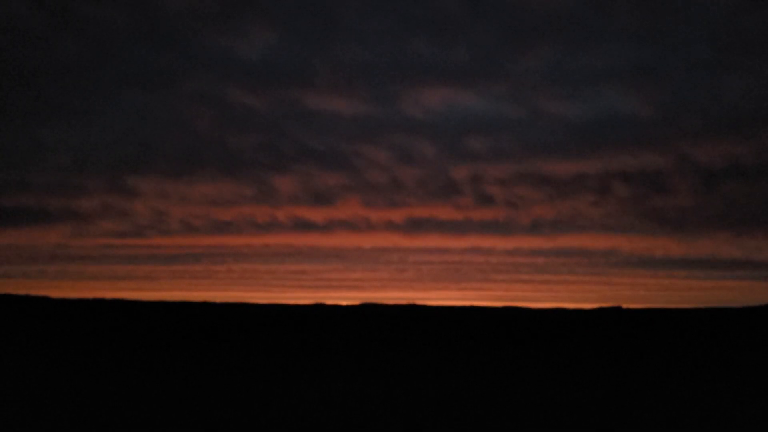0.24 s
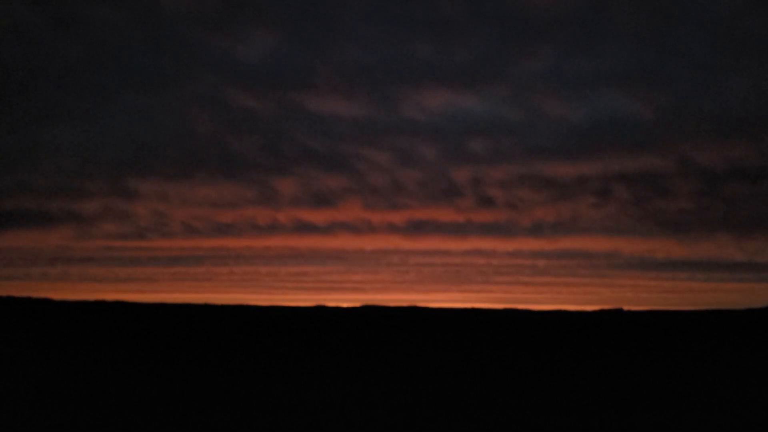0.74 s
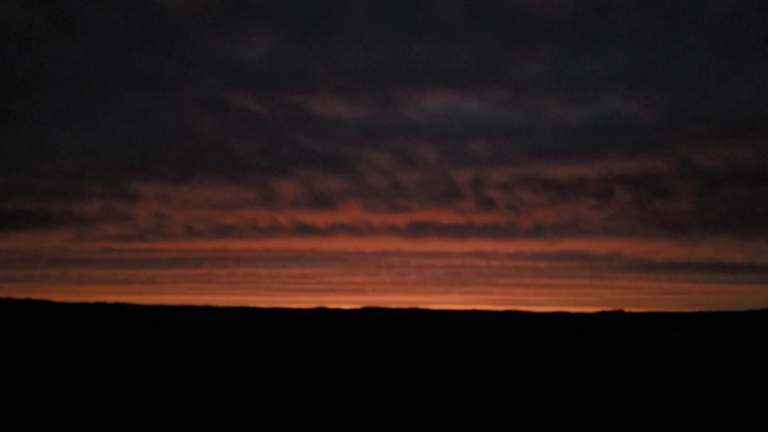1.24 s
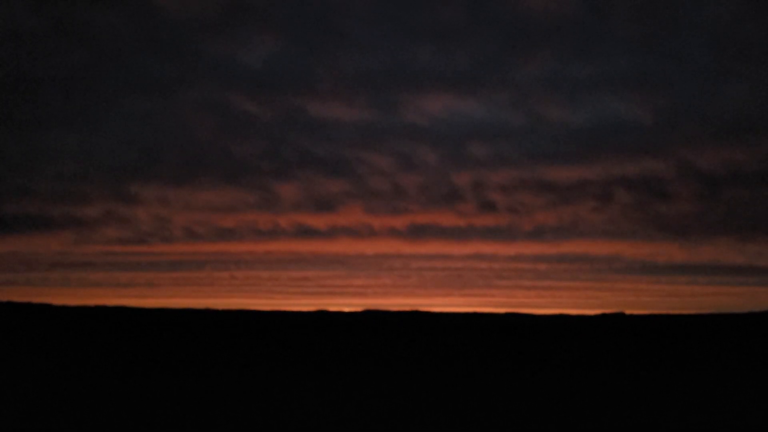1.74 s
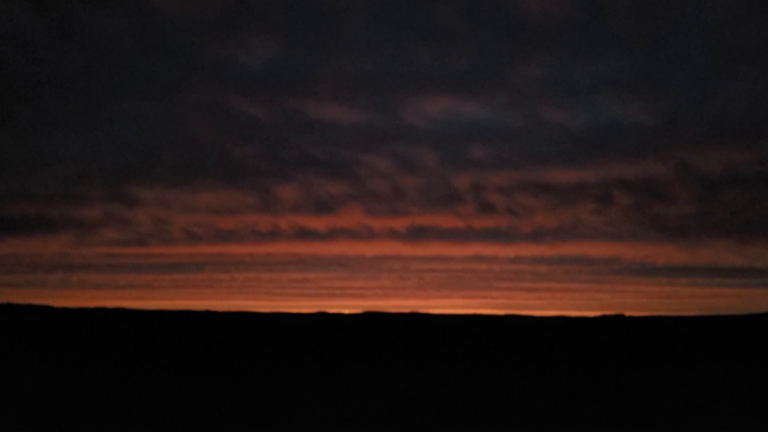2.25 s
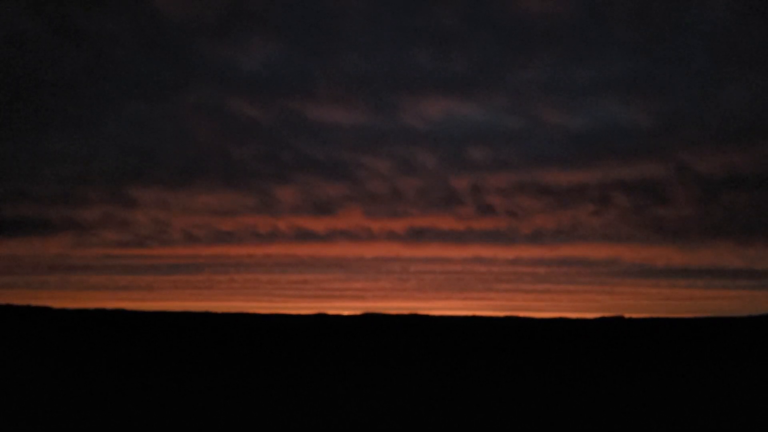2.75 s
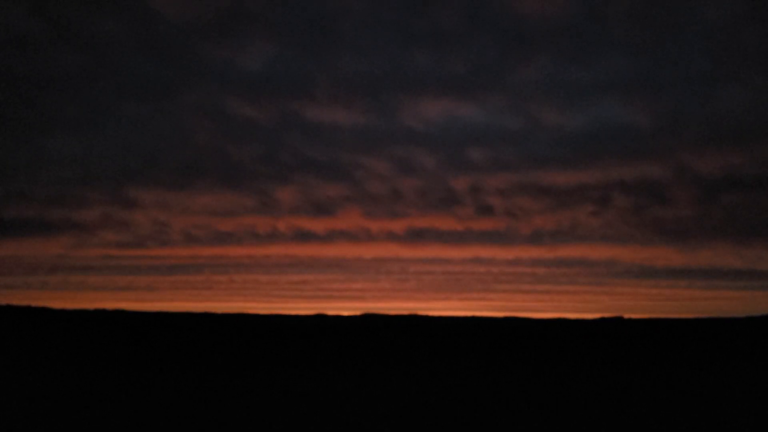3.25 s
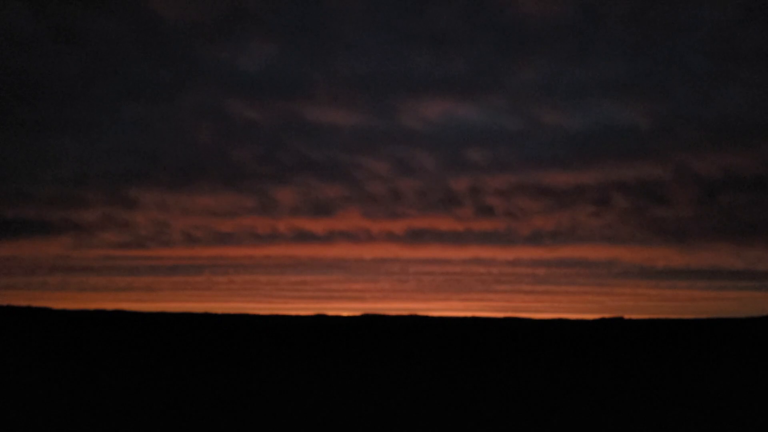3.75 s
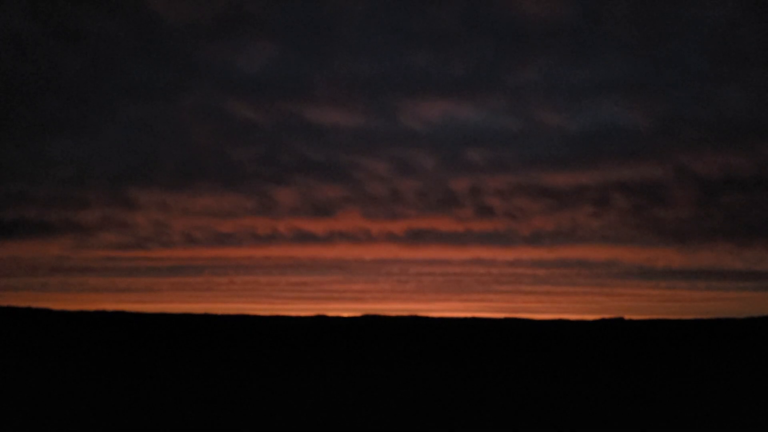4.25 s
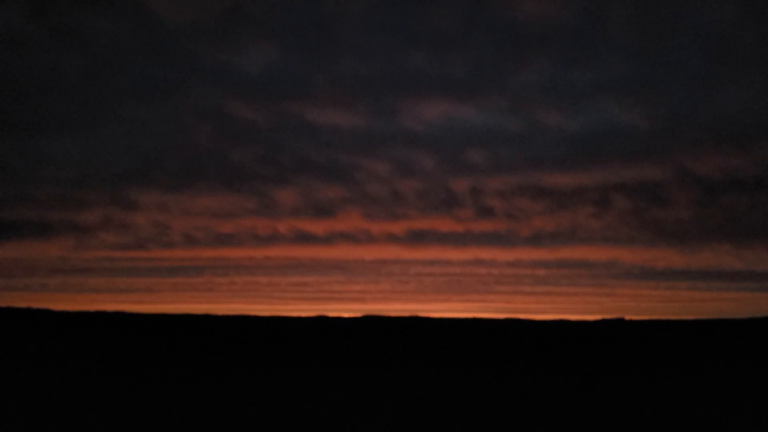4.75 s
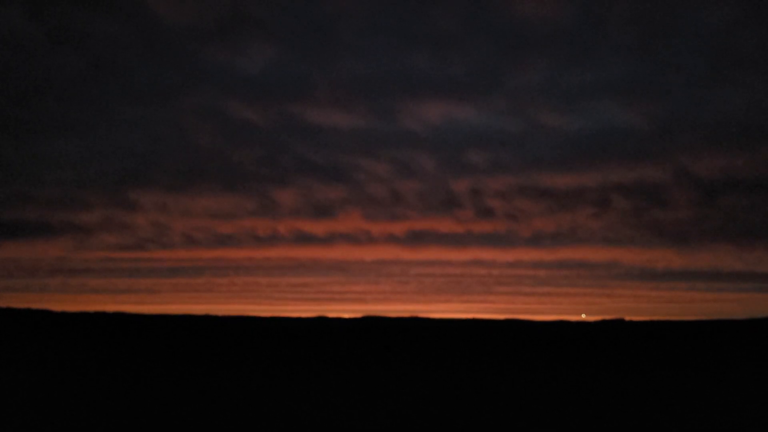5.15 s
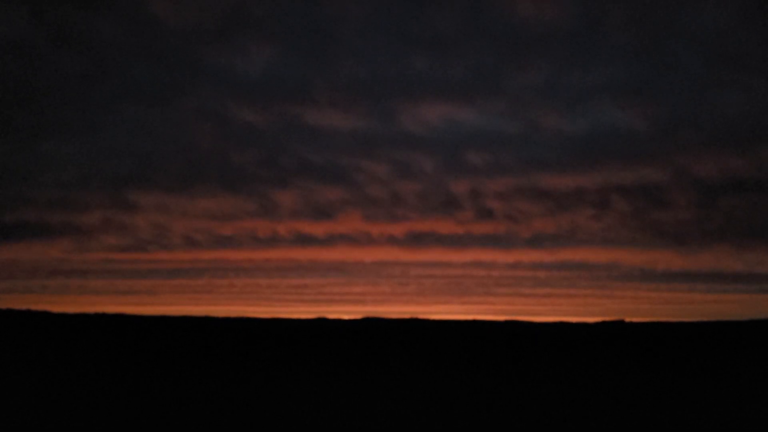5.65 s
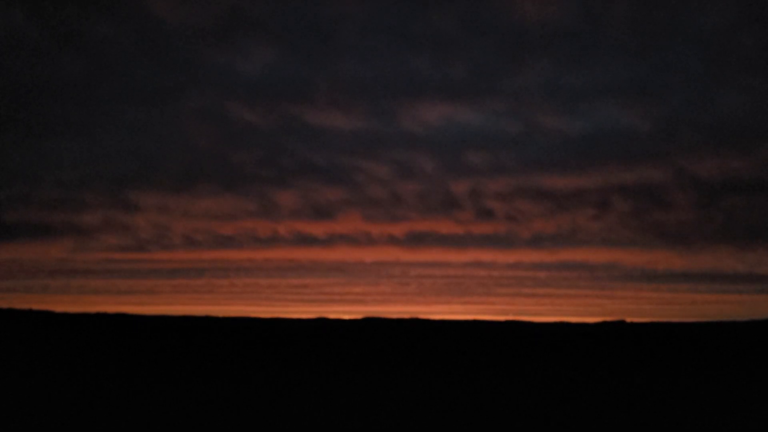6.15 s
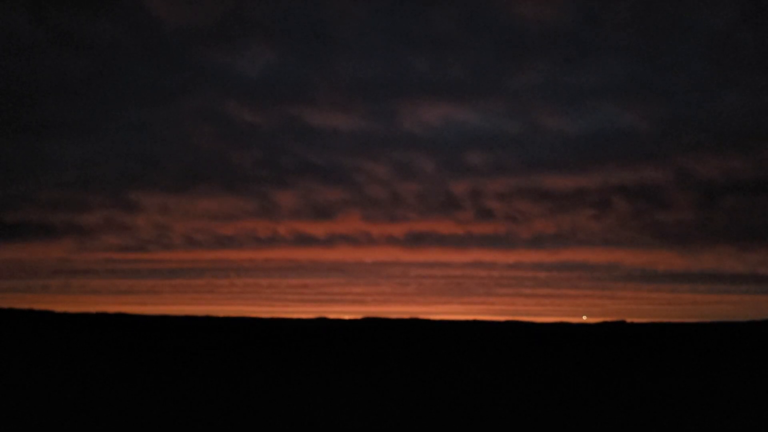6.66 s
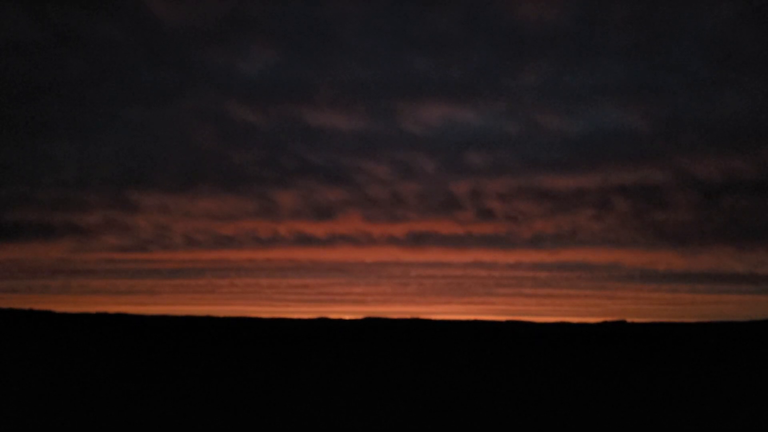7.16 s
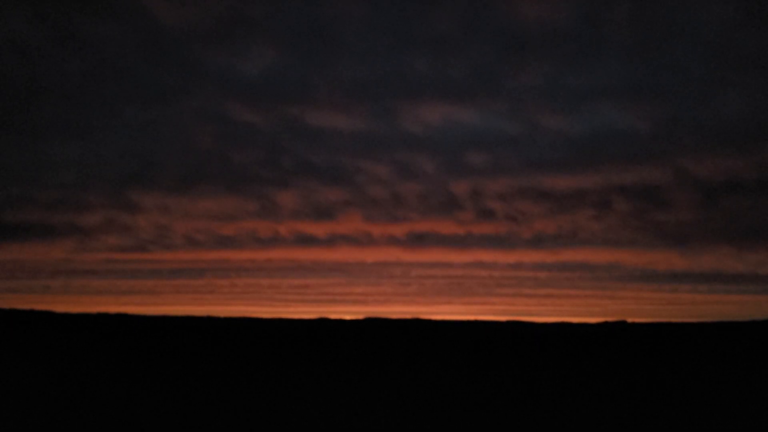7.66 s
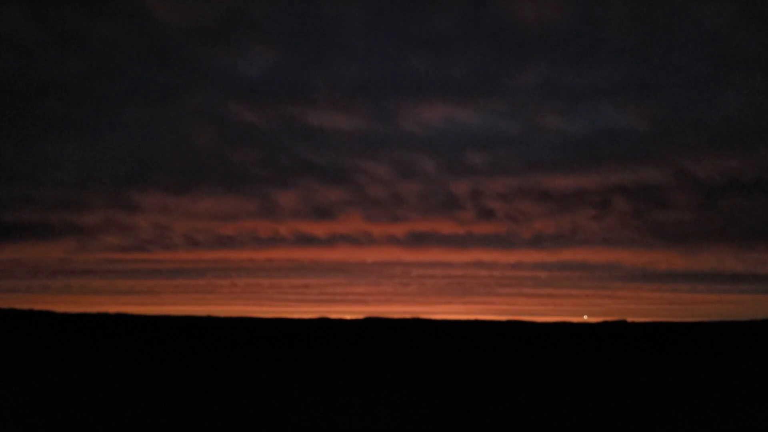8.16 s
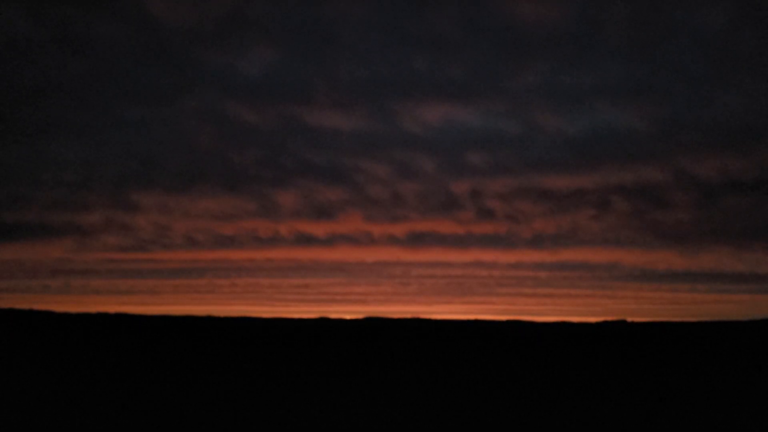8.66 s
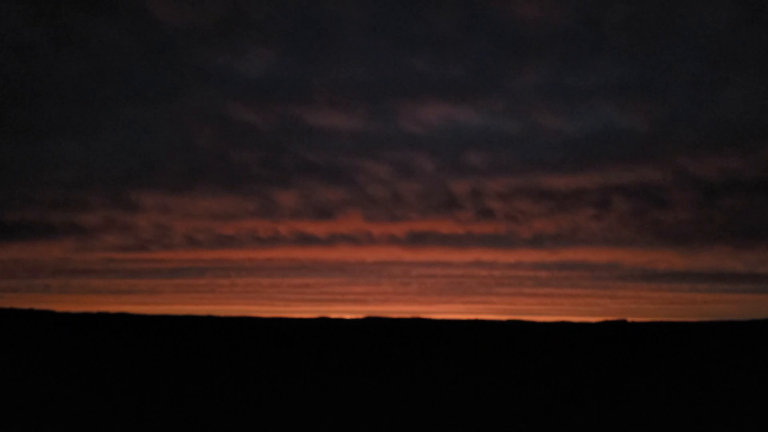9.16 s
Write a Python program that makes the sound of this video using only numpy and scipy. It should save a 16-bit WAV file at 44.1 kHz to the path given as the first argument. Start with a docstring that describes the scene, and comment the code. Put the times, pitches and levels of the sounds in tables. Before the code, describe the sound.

Distant bull elk whistle waveringly across a quiet plain at dusk, then a nearer bull bugles, climbing, turning hoarse and sliding down; camera clicks and hiss.

```python
"""A near bull elk bugles on a still plain: its whistle climbs in register jumps, turns hoarse and slides down.
Before it several far bulls call: sines drawn towards throat resonances, some with overtones.
A few low grunts are falling pulses of the vocal folds; a bird chirps twice in pure gliding notes.
Camera clicks are damped snaps ringing the body, with scuffs and soft bumps, over coloured stereo hiss."""
import sys
import numpy as np
from scipy import signal
from scipy.fft import rfft, irfft, next_fast_len
from scipy.io import wavfile
from scipy.ndimage import uniform_filter1d

SR = 44100
rng = np.random.default_rng(int(sys.argv[2]) if len(sys.argv) > 2 else 0)


def store_pcm(level_fs):
    """Save levels as 16-bit WAV."""
    pcm = np.round(np.clip(level_fs, -1, 1) * 32767).astype(np.int16)
    wavfile.write(sys.argv[1], SR, np.atleast_2d(pcm).T)


N = 415422
TIME = np.arange(N) / SR
# bearings: delay of the right ear
NEAR_LAG_S, FAR_LAG_S, FARTHEST_LAG_S, SHORT_LAG_S = 0.00055, 0.00033, 0.00028, 0.00018


def near_bull(octave_db=-21, ring_hz=3340, rasp_db=-1, lumpy_db=2.5, rasp_cost=1.5, wobble_hz=7):
    """Vocal folds chop the whistle into side tones, then break into a lumpy rasp that takes its power."""
    # effort: time_s, level_db
    effort = [(5.79, -81), (5.83, -63.5), (6.08, -52.5), (6.2, -53.5), (6.4, -51), (7.4, -51.5),
              (8.28, -49.5), (8.385, -50.5), (8.425, -67)]
    # throat resonances where the whistle swells: centre_hz, reach_hz, boost_db
    throat_swells = [(1163, 62, 9.5), (1491.6, 83, 13), (1696, 36, 6.5)]
    # vocal folds, mean pitch: time_s, pitch_hz
    fold_pitch = [(6.12, 254), (6.44, 234.5), (6.8, 225.3), (7.02, 238), (7.13, 256.7), (7.3, 240)]
    # ear balance by pitch: pitch_hz, left_minus_right_db
    ear_balance = [(1190, 1), (1460, 4), (1670, 3)]

    hz = near_pitch()
    boost_db, _ = throat(hz, throat_swells, steepness=4.1)
    throb, rough = hoarseness()
    unsteady_hz = wobble_hz * np.minimum(rough + throb, 1) * drift(14)
    level_db = in_time(effort)[0] + boost_db
    phase, height = whistle(hz + unsteady_hz, level_db, jitter=0.0019, flutter_db=1.1)
    height = height * sounding(effort) / np.sqrt(1 + (rasp_cost * rough) ** 2)

    fold_hz = in_time(fold_pitch)[0] * (1 + (0.0096 + 0.065 * rough) * drift(60))
    folds = 2 * np.pi * np.cumsum(fold_hz) / SR
    side_tones = tract(2 * np.sin(phase) * (np.cos(folds) + 1.1 * np.cos(2 * folds)))
    lumpy_noise = rng.standard_normal(N) * from_db(lumpy_db * drift(39))
    rasp = rms_one(lowpass(tract(lumpy_noise), 1850, order=8))
    voice = np.sin(phase) + throb * side_tones + rough * from_db(rasp_db) * rasp

    # octave rings where it meets a high throat resonance
    octave = from_db(octave_db) * resonance(height * np.sin(2 * phase), ring_hz, 380)
    pan_db = np.interp(hz, *np.transpose(ear_balance))
    return place(height * voice, pan_db, NEAR_LAG_S) + place(octave, -2, FAR_LAG_S)


def near_pitch(jump_s=0.008):
    """Pitch in Hz: stepped notes on the way up, slides on the way down, smoothed over jump_s."""
    # register steps: start_s, pitch_hz, creep_hz_per_s
    steps = [(5.789, 1122, 29.5), (5.936, 1188, 26), (6.19, 1454, 138.5), (6.417, 1640, -10.5),
             (6.799, 1681, 0.5)]
    # two slides, with a jump between: time_s, pitch_hz
    slides = [
        [(7.38, 1625), (7.396, 1677), (7.46, 1496), (7.546, 1438), (7.584, 1350), (7.616, 1199), (7.692, 1168),
         (7.92, 1211)],
        [(7.935, 1383), (8.095, 1448), (8.267, 1442), (8.329, 1327), (8.349, 1160), (8.373, 1147),
         (8.387, 1084), (8.405, 1058)],
    ]
    s, hz, creep = np.transpose(steps)
    note = np.maximum(np.searchsorted(s, TIME) - 1, 0)
    climb = hz[note] + creep[note] * (TIME - s[note])
    slide_points = [point for slide in slides for point in slide]
    pitch = np.where(TIME < slide_points[0][0], climb, in_time(slide_points)[0])
    return uniform_filter1d(pitch, size=int(jump_s * SR))


def hoarseness(onset_s=0.035, clear_throb_db=-44, clear_rasp_db=-34.5):
    """Strength of regular throb and chaotic rasp: slight in the clear voice, strong during the spells."""
    # spells, gains before the voice's own trims: start_s, length_s, throb_db, rasp_db
    spells = [(6.094, .09, -23.5, -25), (6.414, 0.24, -14, -9), (6.631, .17, 1.5, -9),
              (6.799, 0.4, -16, -5.5), (7.217, 0.07, -5, 13), (7.296, 0.2, -34, -20)]
    throb, rasp = from_db(clear_throb_db), from_db(clear_rasp_db)
    for s, length, throb_db, rasp_db in spells:
        spell = held(s - onset_s / 2, length + onset_s, onset_s, onset_s)
        throb = throb + spell * from_db(throb_db)
        rasp = rasp + spell * from_db(rasp_db)
    return throb, rasp


def tract(x):
    """The long throat's resonances, applied twice for dark valleys."""
    # throat resonances: centre_hz, half_width_hz (half the width of one pass), gain_db
    formants = [(1198, 22, -3.5), (1455, 20, 5), (1490, 42.6, 8), (1580, 55, -1), (1856, 45, -14)]
    out = 0
    for hz, half_width, db in formants:
        once = resonance(x, hz, 2 * half_width)
        out = out + from_db(db) * resonance(once, hz, 2 * half_width)
    return out


def second_whistle(trim_db=-1.0):
    """The near bull's second whistle: pure notes independent of the first."""
    # notes: start_s, length_s, start_hz, end_hz, arch_hz, level_db (before trim)
    second_notes = [(7.18, 0.17, 1827, 1830, 5, -63), (7.52, .4, 1832, 1890, 3.9, -59.5)]
    second = from_db(trim_db) * notes(second_notes, jitter=0.003, flutter_db=3)
    return place(second, -1.5, NEAR_LAG_S)


def herd():
    """Distant bulls: almost pure whistles, two of them with overtones that the throat cuts off."""
    # bugles: time_s, aimed_pitch_hz, effort_db
    wavering, low = [(0.876, 888, -84.5), (1.063, 997, -65.5), (1.28, 931, -69.0), (1.384, 962, -65),
                     (1.414, 1060, -65.5), (1.645, 1195, -65), (1.687, 1281, -69), (1.818, 1230, -69.5),
                     (1.899, 1114, -61), (2.068, 1019, -75.5), (2.167, 839, -65), (2.368, 867, -66.5),
                     (2.54, 1183, -75.6), (2.712, 1000, -69), (2.902, 1203, -61), (3.03, 1226, -66.5)], [(1.61, 814, -79), (1.687, 808, -66.5), (1.817, 838, -89),
                                             (1.918, 782, -71.5), (1.982, 693, -87), (2.283, 724, -73),
                                             (2.492, 728, -72), (2.586, 895, -81), (2.847, 843, -77),
                                             (2.965, 864, -80.5), (3.315, 939, -76), (3.503, 976, -72.5),
                                             (3.627, 1182, -70)]
    short, arched = [(2.94, 1350, -56), (3.001, 1385, -70), (3.123, 1510, -68), (3.331, 1434, -63),
                     (3.518, 1418, -65), (3.57, 1240, -63), (3.627, 810, -65.5)], [(3.635, 1310, -67), (3.802, 1441, -64.5), (3.859, 1575, -65.5),
                                          (3.972, 1565, -65), (4.022, 1653, -65), (4.332, 1721, -70.5),
                                          (4.447, 1783, -66.5), (4.641, 1726, -79), (4.674, 1685, -64.5),
                                          (4.794, 1660, -67), (4.836, 1500, -59.5), (4.914, 1391, -62.5),
                                          (4.979, 888, -70)]
    # throat resonances of each bull: centre_hz, reach_hz, boost_db
    wavering_throat, low_throat = [(951, 118, 16), (1267, 76, 12)], [(748, 30, 6.9), (1035, 138, 11.5)]
    short_throat, arched_throat = [(910, 120, 8.1), (1236, 64, 6.8), (1497, 75, 8)], [(1034, 110, 6.4), (1492, 89.6, 13.6),
                                                         (1695, 38.4, 10.8)]
    return (distant_bull(wavering, wavering_throat, jitter=0.002, pan_db=3.5, lag_s=FAR_LAG_S, octave_db=3.5)
            + distant_bull(low, low_throat, jitter=0.0028, pan_db=-1.0, lag_s=FAR_LAG_S, octave_db=11)
            + distant_bull(short, short_throat, jitter=0.0025, pan_db=1.5, lag_s=SHORT_LAG_S)
            + distant_bull(arched, arched_throat, jitter=0.0029, pan_db=12.5, lag_s=FAR_LAG_S))


def distant_bull(bugle, resonances, jitter, pan_db, lag_s, octave_db=None, third_db=-15,
                 throat_hz=1780, patchy_db=3, pull_share=0.45, break_fall_hz_per_s=7000,
                 break_jitter=0.03, break_flutter_db=1):
    """Throat resonances pull the whistle and swell it; a reedy voice adds overtones without that swell."""
    # higher resonance where octaves swell: centre_hz, reach_hz, boost_db
    overtone_throat = [(1742, 54, 3.3)]
    aim_hz, effort_db = in_time(bugle)
    boost_db, way_hz = throat(aim_hz, resonances, steepness=12)
    hz = aim_hz + pull_share * way_hz
    # a fast fall breaks the voice up
    fall = np.clip(-np.gradient(aim_hz) * SR / break_fall_hz_per_s, 0, 1)
    breaking = uniform_filter1d(fall ** 2, size=1000)
    phase, height = whistle(hz, effort_db, jitter + break_jitter * breaking, flutter_db=1.94)
    height = height * sounding(bugle) * from_db(break_flutter_db * breaking * drift(60))
    out = place(height * from_db(boost_db) * np.sin(phase), pan_db, lag_s)
    if octave_db is None:
        return out
    ring_db, _ = throat(2 * hz, overtone_throat, steepness=3)
    harmonics = np.sin(2 * phase) + from_db(third_db) * np.sin(3 * phase)
    overtones = height * from_db(octave_db + ring_db) * harmonics
    patchy = overtones * from_db(patchy_db * drift(7.6))
    return out + place(lowpass(patchy, throat_hz, order=8), 7.3, lag_s)


def far_whistles(trim_db=-4.5):
    """Faint far notes, short and long, a few stray overtones and an echo of the near bull; level unsteady."""
    # notes: start_s, length_s, start_hz, end_hz, arch_hz, level_db (before trim)
    far_notes = [(.25, 0.15, 905, 1090, -4.5, -65.5), (.4, 0.13, 1073, 1055, 7, -73),
                 (.37, 0.42, 536, 541, -3, -76), (.55, 1.7, 1355, 1335, 39.5, -70.5),
                 (.83, 0.093, 1720, 1830, -5, -57), (2.0, 0.41, 2450, 2470, -19, -63.5),
                 (3.4, 0.16, 665, 697, 0, -78), (4.14, .33, 1182, 1160, -1, -76),
                 (5.265, .045, 1550, 1570, -17, -50), (5.305, .035, 1370, 1350, 2, -55),
                 (5.33, 0.031, 1170, 1100, 0, -57), (5.412, 0.027, 1390, 1435, 0, -55.5),
                 (5.5, .24, 1800, 1580, 80, -73), (5.72, 0.077, 1510, 1780, 7, -66),
                 (8.45, 0.0703, 1625, 1417, -1, -61)]
    faint = from_db(trim_db) * notes(far_notes, jitter=0.0071, flutter_db=6.5)
    return place(faint, 0.83, FARTHEST_LAG_S)


def grunts(overtone_db=-14):
    """Short falling pulses of the vocal folds, mostly fundamental."""
    # grunts: start_s, length_s, start_hz, end_hz, level_db
    pulses = [(2.926, 0.11, 179, 123.7, -64.5), (4.93, 0.094, 186, 145.8, -75),
              (5.365, 0.132, 176, 121, -62.5)]
    out, waver = np.zeros(N), 1 + 0.078 * drift(60)
    for s, length, start_hz, end_hz, db in pulses:
        hz = np.interp(TIME, [s, s + length], [start_hz, end_hz]) * waver
        phase = 2 * np.pi * np.cumsum(hz) / SR
        saw = phase / np.pi % 2 - 1
        out += from_db(db) * swell(s, length) * (from_db(overtone_db) * saw - np.sin(phase))
    return place(lowpass(out, 1400), -1, FAR_LAG_S)


def bird(trim_db=-1.5):
    """Two chirps: pure notes gliding along an arch."""
    # chirps: start_s, length_s, start_hz, end_hz, arch_hz, level_db (before trim)
    chirps = [(4.12, 0.15, 4740, 4190, -470, -66), (8.63, 0.14, 4180, 4250, -4, -71.5)]
    return place(from_db(trim_db) * notes(chirps, jitter=0.005, flutter_db=1.5), 3.4, FARTHEST_LAG_S)


def plain(x, echo_db=-25, t60=0.26, slope_db=-27, slope_s=0.13, slope_t60=0.7):
    """Ground and scrub scatter a faint, short tail; a far slope sends back a later, blurred one."""
    t = np.arange(SR) / SR
    tail = 0
    for db, delay_s, decay_s in ((echo_db, 0.015, t60), (slope_db, slope_s, slope_t60)):
        scatter = rng.standard_normal((2, len(t))) * from_db(-60 * t / decay_s) * (t > delay_s)
        tail = tail + from_db(db) * scatter / np.sqrt(np.sum(scatter ** 2, axis=1, keepdims=True))
    return x + signal.fftconvolve(x, tail, axes=1)[:, :N]


def camera_clicks(damping=0.73, scuff_db=-19, scuff_top_db=-42, scuff_t60_s=0.3, dull_hz=5000):
    """Each click is a heavily damped snap that rings the body; fingers scuff after it."""
    # clicks: start_s, level_db, centre_hz, left_minus_right_db
    clicks = [(0.959, -40, 885, -21), (0.976, -24, 2680, -20), (.976, -23, 760, -25),
              (.9802, -11.5, 940, -30), (0.9796, -21, 275, -30), (0.9812, -19, 442, -18),
              (0.9828, -34, 1390, -15), (1.107, -50, 507, -19), (1.524, -51, 540, -19),
              (1.57, -49.5, 377, -22), (1.729, -54.5, 395, -15), (2.929, -53.5, 354, -9),
              (5.408, -50, 600, -12), (5.441, -51, 604, -16), (5.51, -52, 426, -23),
              (5.667, -35.5, 574, -16), (6.249, -47, 595, -15), (6.326, -42, 714, -23),
              (6.406, -37, 450, -13), (7.591, -48.5, 535, -21), (7.635, -49, 550, -20),
              (7.906, -45, 414, -9), (7.966, -49, 304, -14), (9.172, -44.5, 344, -8), (9.182, -51, 245, -2),
              (9.38, -54.5, 338, -7)]
    # camera body modes: pitch_hz, mean_level_db, t60_s
    body_modes = [(60.6, -30, 0.057), (125, -25.5, 0.074), (226, -40, 0.29), (532, -18.5, 0.026),
                  (840, -32, 0.011), (1100, -30, 0.0088), (1310, -51, 0.018), (1660, -33, 0.0089),
                  (2570, -18, 0.026)]
    out, t = np.zeros((2, N)), np.arange(SR // 4) / SR
    for s, db, hz, pan_db in clicks:
        snap = knock(hz, damping * hz, size=len(t))
        body = 0
        for mode_hz, level_db, t60_s in body_modes:
            ring = knock(mode_hz, np.log(1000) / (np.pi * t60_s), size=len(t))
            body = body + from_db(level_db + rng.normal(0, 1)) * ring
        rub = resonance(resonance(rng.standard_normal(len(t)), hz, hz), hz, hz)
        scuff = rms_one(rub) * from_db(-60 * t / scuff_t60_s)
        sound = from_db(db) * (snap + body) + from_db(min(db, scuff_top_db) + scuff_db) * scuff
        # lower contacts are duller
        add(out, s, from_db([[pan_db], [0]]) * lowpass(sound, min(1.57 * hz, dull_hz)))
    return out


def hand_bumps(bump_hz=130, pan_db=-13):
    """Soft bumps of the hand: swells of low rumble, weaker on the left."""
    # bumps: start_s, length_s, level_db
    bumps = [(1.523, 0.097, -65), (5.403, 0.11, -66), (7.396, 0.053, -60.5), (7.531, 0.18, -59.5),
             (7.59, 0.034, -73), (7.787, 0.061, -63.5), (7.928, 0.12, -54)]
    noise = resonance(resonance(rng.standard_normal(N), 58, 90), 58, 90)
    rumble = rms_one(lowpass(noise, bump_hz))
    level = sum(from_db(db) * swell(s, length) ** 2 for s, length, db in bumps)
    return rumble * level * from_db([[pan_db], [0]])


def hiss(near_lift_db=3.0, herd_lift_db=1.07, lag_s=0.00045):
    """Hiss coloured differently per ear and partly shared; it lifts a little under the calls."""
    # night air and hiss, before lifts; lead fades out below 400 Hz:
    # pitch_hz, left_db_per_hz, right_db_per_hz, likeness_0_to_1, left_lead_rad
    spectrum = [(24.8, -115, -111, 0.8, 4), (56, -105, -101, 0.3, -3), (107, -100, -101, 1, -3),
                (149, -109, -109, 0, 1.5), (360, -110, -109, 0.8, 0.5), (694, -110, -104, 0.7, 0.2),
                (1213, -101, -99, 0.5, -1.54), (1560, -101.5, -93, 0.6, -1.3), (2307, -109, -96, 0.9, 1.2),
                (2750, -92, -97, 0.92, 0.09), (3245, -89, -99, 0.83, -1.1), (3780, -102, -102, 1, -2),
                (4795, -103, -101, 0.7, 0.6), (4944, -118, -106, 1, -1.2), (5620, -112, -114, 0.65, -7.5),
                (5920, -103, -116, 0.7, -1), (6930, -99, -129, 0.2, 0.2), (7905, -109, -131, 0.3, 11),
                (7970, -119, -128, 0.4, -4), (9240, -129, -128, 0, -6.5), (15400, -127, -127, 0.18, 4.5)]
    size = next_fast_len(N)
    hz = np.fft.rfftfreq(size, 1 / SR)
    points, *columns = np.transpose(spectrum)
    left_db, right_db, alike, lead = [np.interp(np.log(hz + 1), np.log(points), c) for c in columns]
    alike = np.clip(alike, 0, 1)
    # long waves reach both ears in step
    lead = lead * np.clip(hz / 400, 0, 1) ** 2
    shared, own = rfft(rng.standard_normal((2, size))) * np.sqrt(SR / 2)
    turn = np.exp(1j * (lead + 2 * np.pi * hz * lag_s))
    left = alike * shared * turn + np.sqrt(1 - alike ** 2) * own
    noise = irfft(np.array([left * from_db(left_db), shared * from_db(right_db)]), size)[:, :N]
    near_lift = np.interp(TIME, [5.8, 6.15, 8.3, 8.5], [0, 1, 1, 0])
    herd_lift = np.interp(TIME, [0.6, 1.2, 4.9, 5.8], [0, 1, 1, 0])
    return noise * from_db(near_lift_db * near_lift + herd_lift_db * herd_lift)


def throat(hz, resonances, steepness):
    """Within reach of a resonance a whistle swells: boost in dB and the way to that resonance in Hz."""
    boost_db, way_hz = 0, 0
    for centre, reach, db in resonances:
        grip = 1 / (1 + np.abs((centre - hz) / reach) ** steepness)
        boost_db = boost_db + grip * db
        way_hz = way_hz + grip * (centre - hz)
    return boost_db, way_hz


def whistle(hz, level_db, jitter, flutter_db):
    """Phase and height of a tone that trembles in pitch and level."""
    phase = 2 * np.pi * np.cumsum(hz * (1 + jitter * drift(70))) / SR
    return phase, np.sqrt(2) * from_db(level_db + flutter_db * drift(20))


def notes(rows, jitter, flutter_db, attack_share=0.15, release_share=0.14):
    """Pure whistled notes, each gliding along an arch."""
    out, waver = np.zeros((1, N)), 1 + jitter * drift(70)
    flutter = np.sqrt(2) * from_db(flutter_db * drift(20))
    for s, length, start_hz, end_hz, arch_hz, db in rows:
        now = (TIME >= s) & (TIME < s + length)
        along = (TIME[now] - s) / length
        hz = start_hz + (end_hz - start_hz) * along + arch_hz * (1 - (2 * along - 1) ** 2)
        envelope = np.clip(np.minimum(along / attack_share, (1 - along) / release_share), 0, 1)
        tone = np.sin(2 * np.pi * np.cumsum(hz * waver[now]) / SR)
        add(out, s, (from_db(db) * envelope * flutter[now] * tone)[None])
    return out[0]


def knock(hz, width_hz, size):
    """A quickly damped ring of height 1 that carries no steady push."""
    ring = resonance(resonance(signal.unit_impulse(size), hz, width_hz), hz, 2 * hz)
    return ring / np.max(np.abs(ring))


def resonance(x, hz, width_hz):
    """Two-pole resonance with gain about 1 at its peak."""
    r = np.exp(-np.pi * width_hz / SR)
    zeros = np.array([1, 0, -1]) * (1 - r * r) / 2
    return signal.lfilter(zeros, [1, -2 * r * np.cos(2 * np.pi * hz / SR), r * r], x)


def lowpass(x, hz, order=2):
    """Butterworth low-pass."""
    return signal.sosfilt(signal.butter(order, hz, fs=SR, output="sos"), x)


def from_db(db):
    """Decibels to gain."""
    return 10 ** (np.asarray(db) / 20)


def rms_one(x):
    """Scale to unit power."""
    return x / np.sqrt(np.mean(x ** 2) + 1e-20)


def in_time(rows):
    """Each column of a curve, at every sample."""
    s, *columns = np.transpose(rows)
    return [np.interp(TIME, s, c) for c in columns]


def drift(rate_hz):
    """Random wander: straight lines between normal knots of spread 1, two knots per cycle of the rate."""
    knots = rng.standard_normal(8192)
    return np.interp(TIME * 2 * rate_hz, np.arange(len(knots)), knots)


def swell(start, length):
    """A smooth rise and fall."""
    return np.sin(np.pi * np.clip((TIME - start) / length, 0, 1))


def held(start, length, attack_s, release_s):
    """Attack, hold, release."""
    return np.clip(np.minimum((TIME - start) / attack_s, (start + length - TIME) / release_s), 0, 1)


def sounding(rows, ramp_s=0.0076):
    """Open from the first point of a curve to its last."""
    return held(rows[0][0], rows[-1][0] - rows[0][0], ramp_s, ramp_s)


def add(track, s, sound):
    """Mix a short sound in at time s."""
    at = int(s * SR)
    track[:, at:at + sound.shape[1]] += sound[:, :N - at]


def place(x, pan_db, lag_s):
    """Share power between the ears, pan_db left over right; the right hears it later."""
    ratio = from_db(pan_db)
    return np.array([ratio * x, np.interp(TIME - lag_s, TIME, x)]) * np.sqrt(2 / (1 + ratio ** 2))


def scene():
    """Calls over the plain, with the camera's own sounds in front."""
    calls = near_bull() + second_whistle() + herd() + far_whistles() + grunts() + bird()
    return plain(calls) + camera_clicks() + hand_bumps() + hiss()


def record(dry, cutoff_hz=15700):
    """A steep elliptic low-pass cuts the top."""
    return signal.sosfilt(signal.ellip(12, 0.1, 80, cutoff_hz, fs=SR, output="sos"), dry)


dry = scene()
out = record(dry)
store_pcm(out)
```